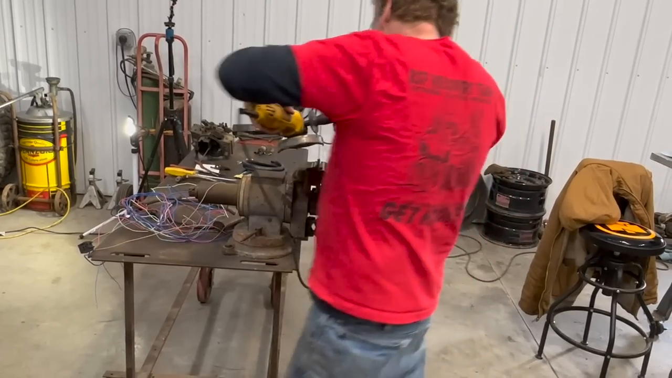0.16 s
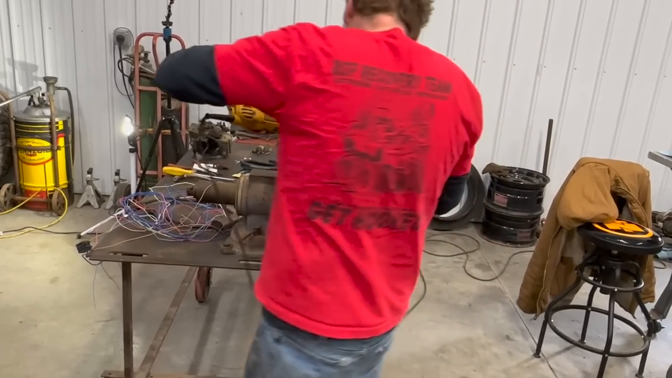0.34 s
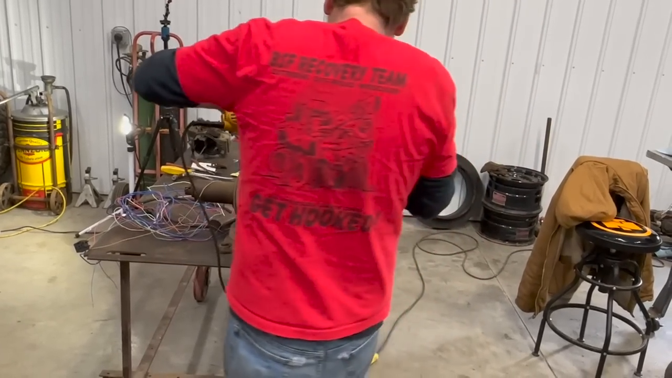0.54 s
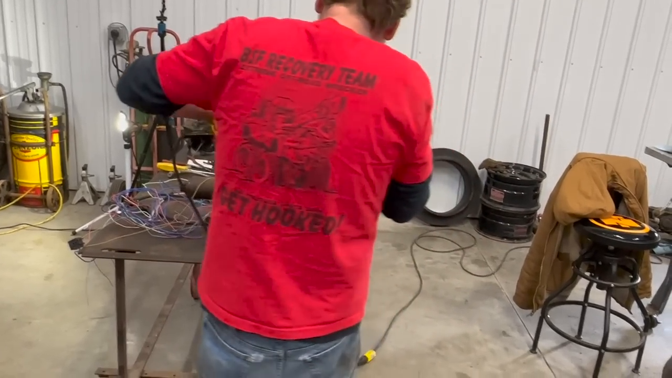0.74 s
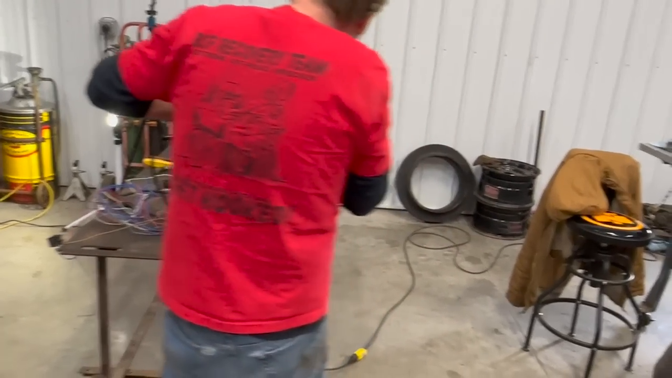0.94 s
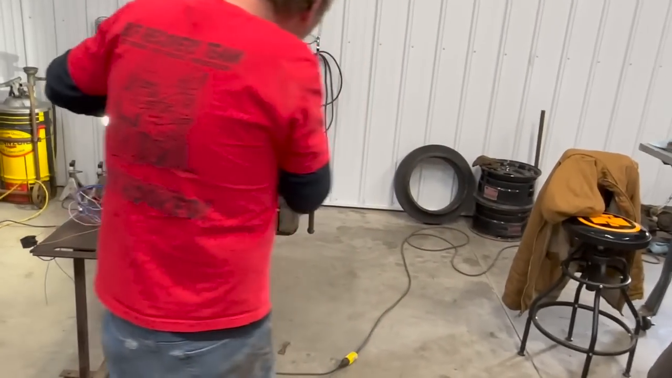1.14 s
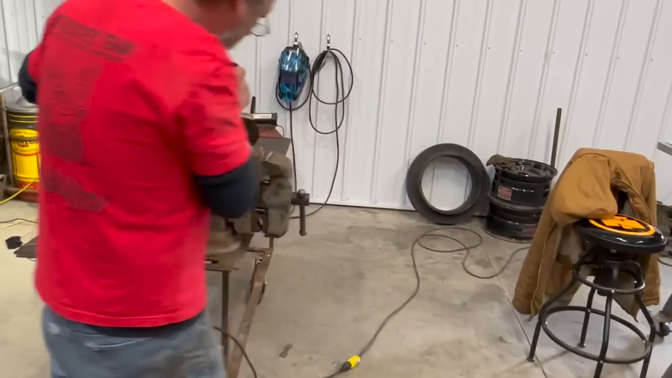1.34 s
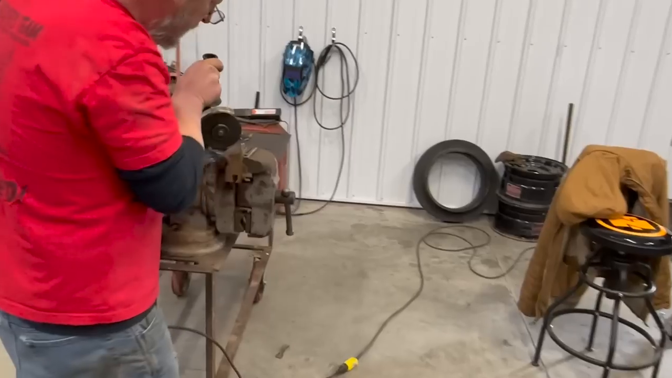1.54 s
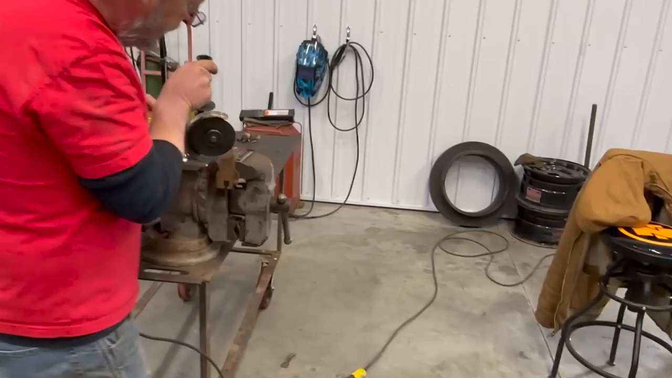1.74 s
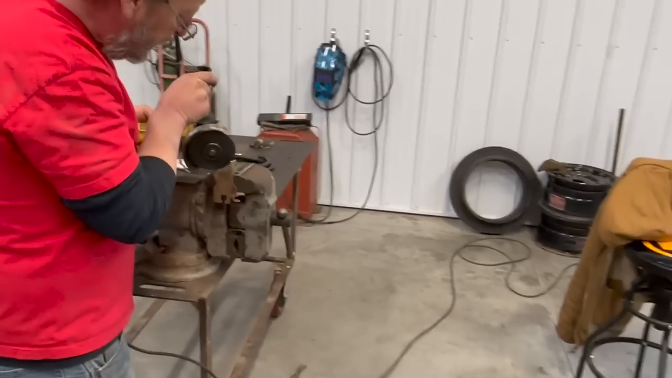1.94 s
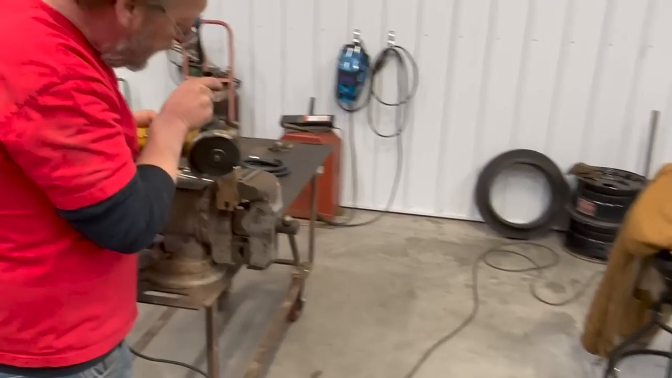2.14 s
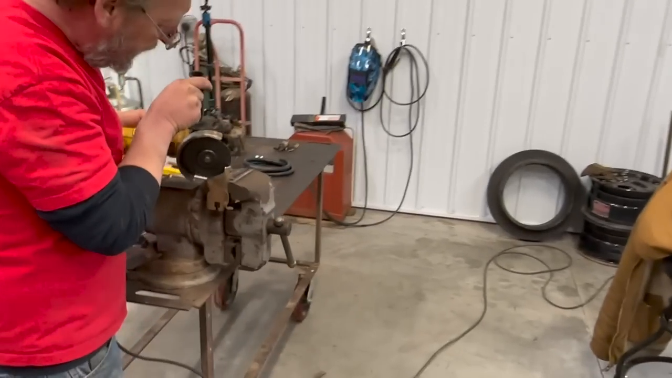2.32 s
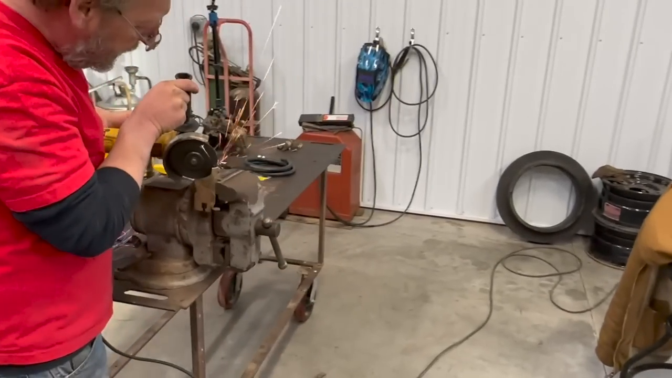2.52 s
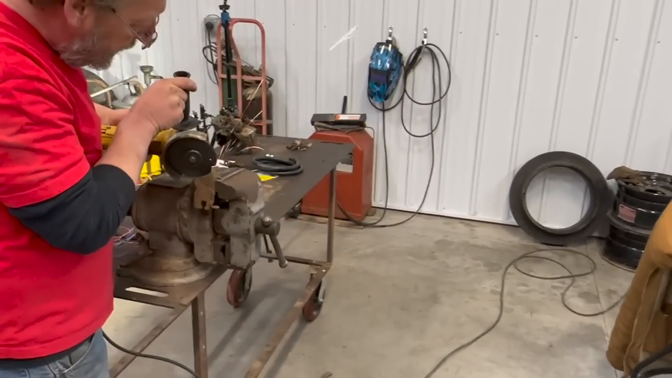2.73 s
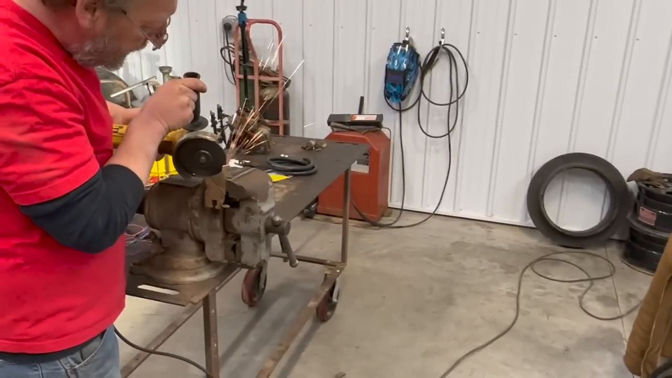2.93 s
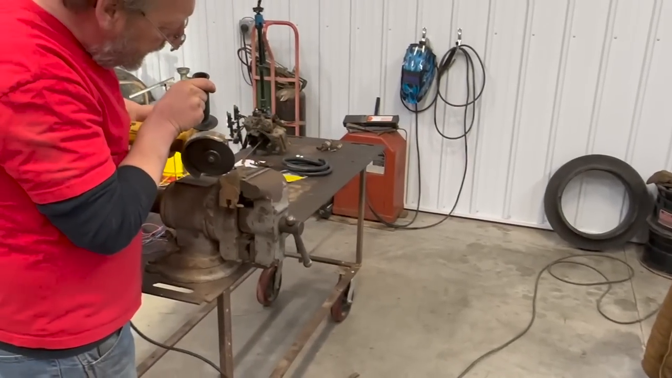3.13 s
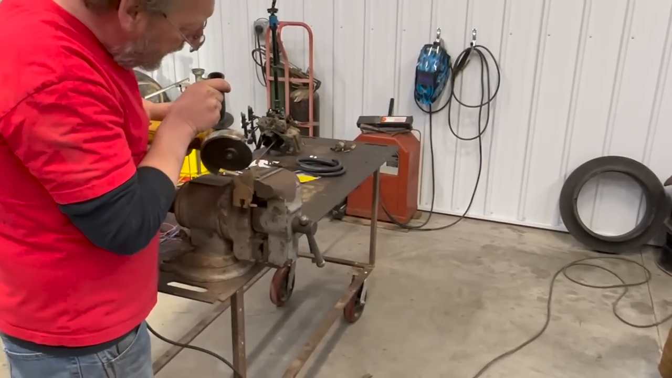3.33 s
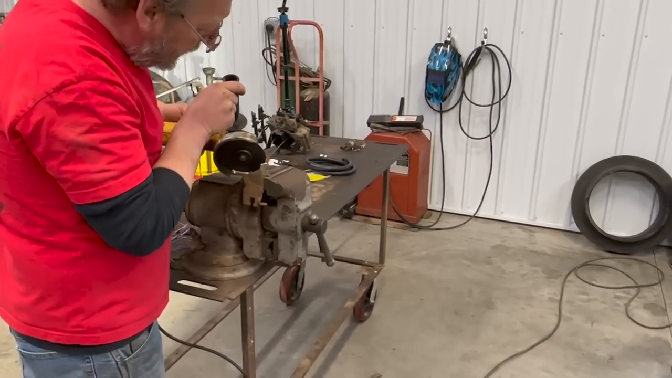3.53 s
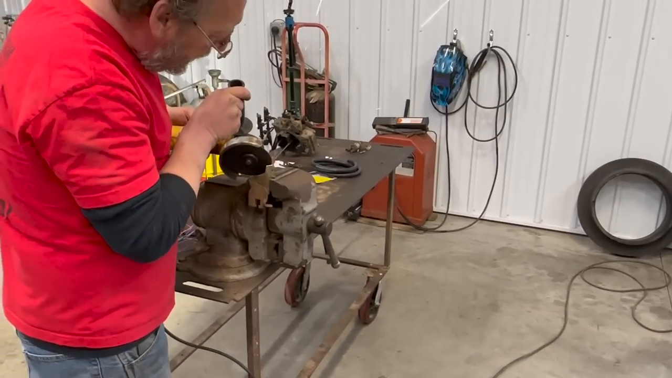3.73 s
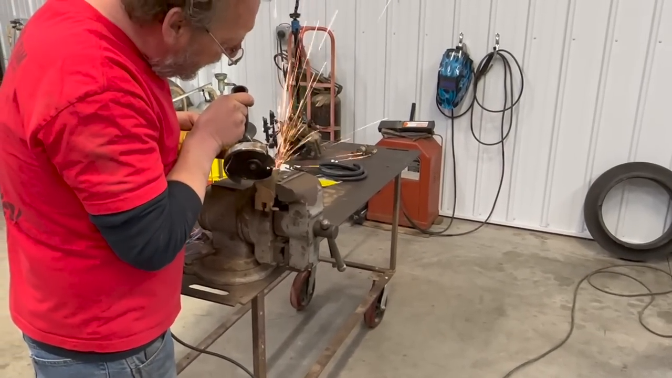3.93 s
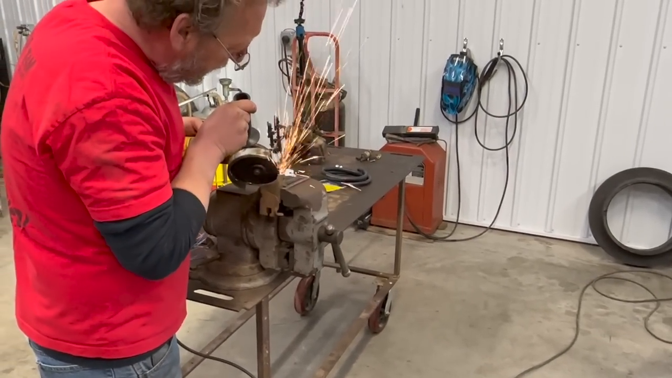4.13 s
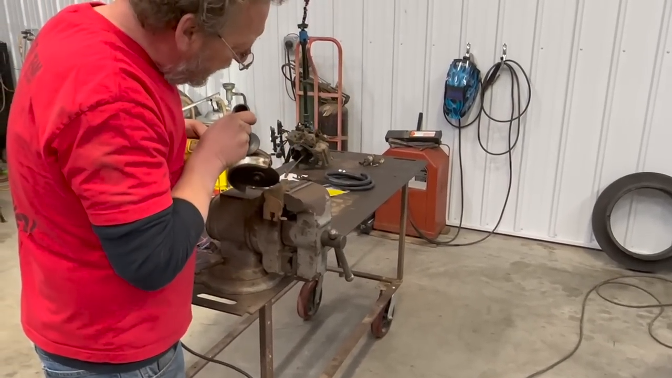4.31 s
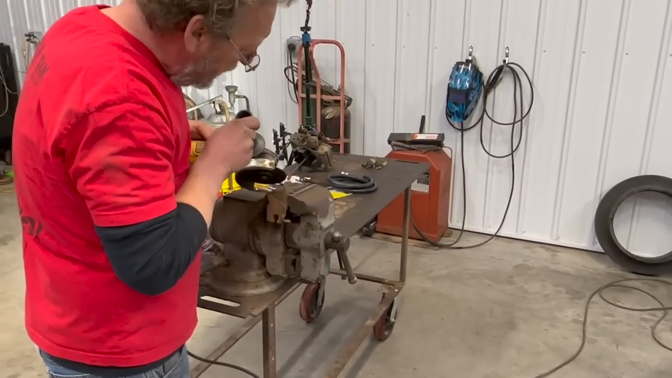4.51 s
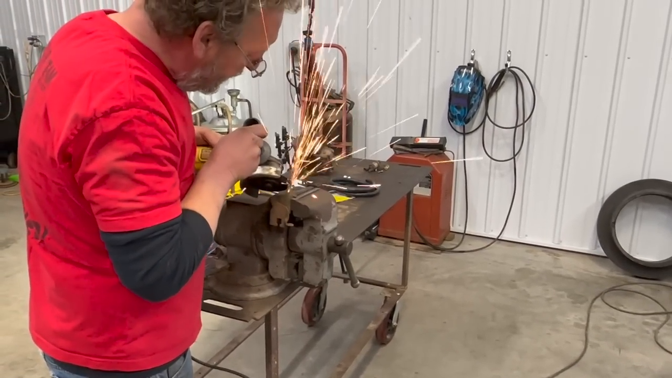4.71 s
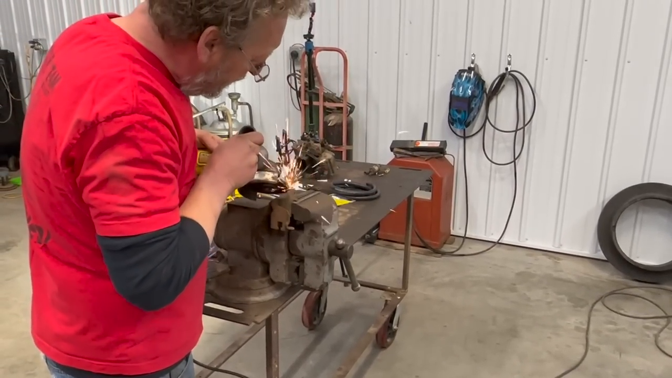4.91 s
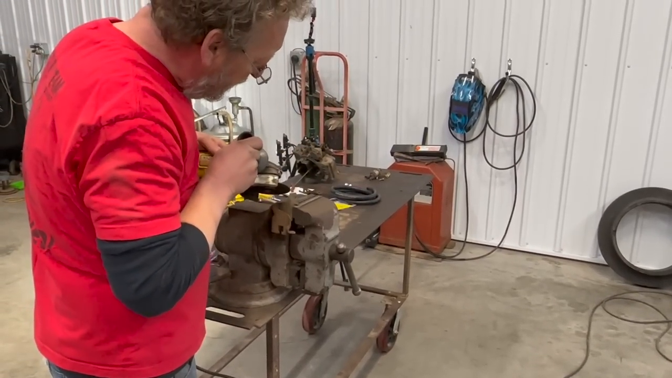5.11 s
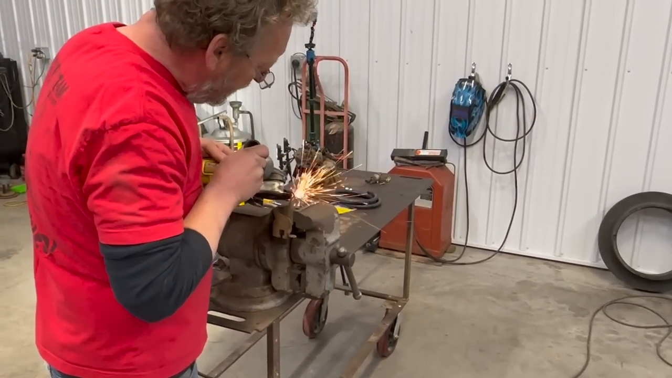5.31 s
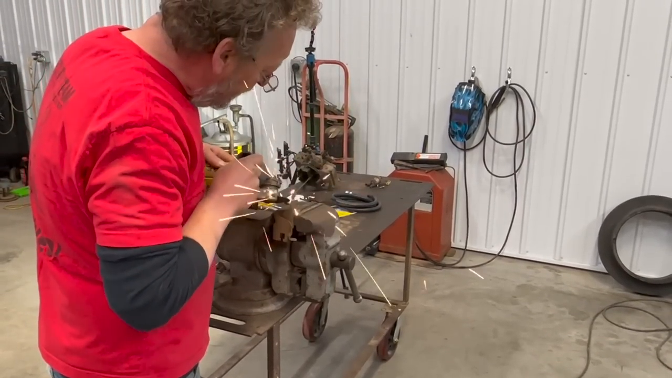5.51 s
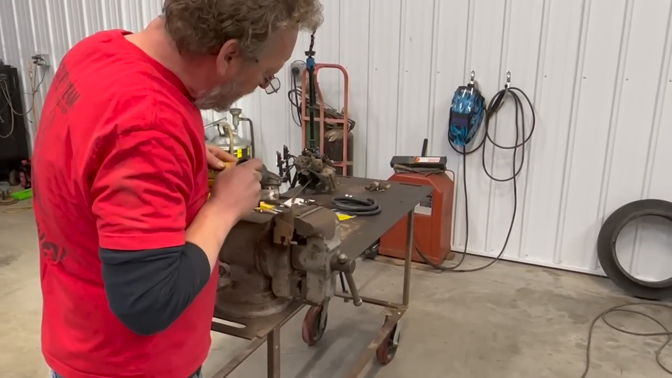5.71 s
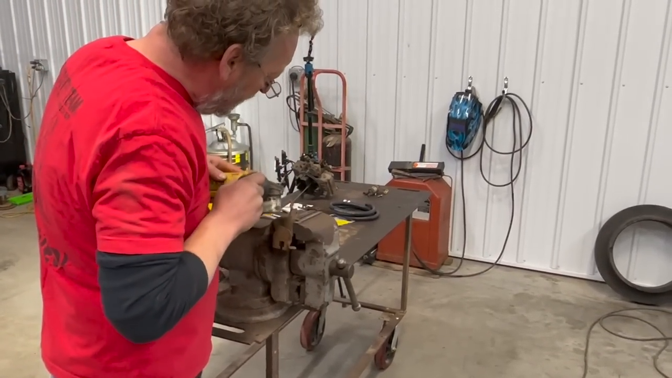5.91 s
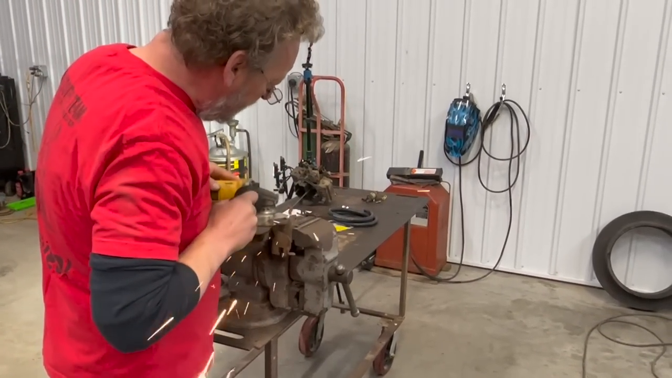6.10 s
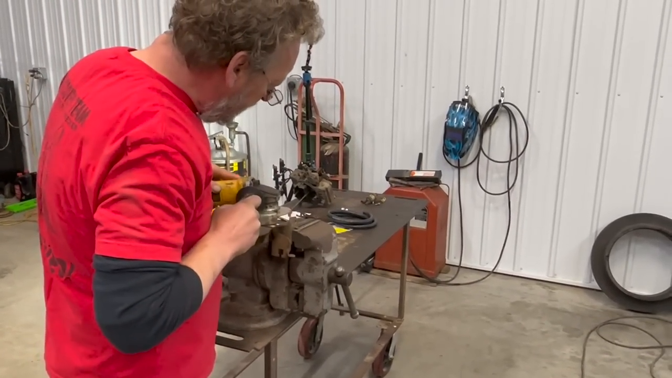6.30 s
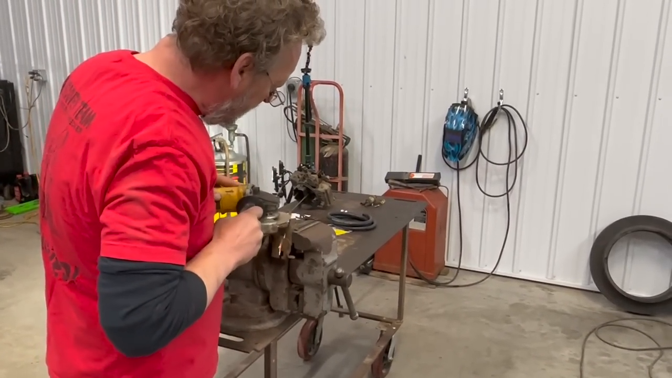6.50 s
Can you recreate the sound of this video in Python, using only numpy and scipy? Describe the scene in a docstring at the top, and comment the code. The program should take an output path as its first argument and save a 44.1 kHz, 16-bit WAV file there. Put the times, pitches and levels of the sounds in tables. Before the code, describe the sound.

An angle grinder heard from a few steps away, moving slightly across a wide stereo picture. For over two seconds it only whirs and hisses, briefly muffled, while shoes scuff dully nearby. Then the cutting wheel touches clamped steel: two longer scraping passes with metallic squeals, short chirping touches and more harsh rasps, ending in spaced bites. The motor sags slightly under load; the shop answers with a short echo.

```python
"""An angle grinder runs free in a metal workshop: its motor hums, its fan rushes and whistles, its spindle bearing rattles.
Then the thin wheel is pressed, pass after pass, into a steel bracket in a vise; each pass rasps and drags the speed down.
Someone takes a few shuffling steps on the concrete near the microphone, and the shop adds a short echo.
Air, chips and shoes are shaped noise; hum, whistle and squeals are sine waves; metal parts are resonances.
One turning angle drives hum, whistle, bearing, cut and squeals, so their pitches sag together under load."""
import sys
import numpy as np
from scipy import signal
from scipy.fft import rfft, irfft, next_fast_len
from scipy.io import wavfile
from scipy.ndimage import uniform_filter1d, map_coordinates

SR = 44100
rng = np.random.default_rng(int(sys.argv[2]) if len(sys.argv) > 2 else 0)


def unload_wav(signal):
    """Save mono or channel-first audio to the path in sys.argv[1] as 16-bit WAV at rate SR, clipped to [-1, 1]."""
    wavfile.write(
        sys.argv[1],
        SR,
        np.round(np.clip(np.atleast_2d(signal).T, -1, 1) * 32767).astype(np.int16),
    )


N = 288855  # length in samples


def amp(db):
    """Decibels become a plain multiplier."""
    return 10 ** (np.asarray(db) / 20)


def unit(x):
    """x scaled to an average strength (rms) of 1."""
    return x / np.sqrt(np.mean(x ** 2) + 1e-20)


def along(points, hz):
    """Reads a curve of (Hz, value) points on a log pitch axis."""
    f, v = np.transpose(points)
    return np.interp(np.log(hz + 1), np.log(f), v)


def curves(rows):
    """One value per sample for each column after the time."""
    s, *cols = np.transpose(rows)
    return [np.interp(np.arange(N) / SR, s, c) for c in cols]


def wobble(rate):
    """A smooth random curve with this many knots a second."""
    knots = rng.standard_normal(int(N * rate / SR) + 4)
    return map_coordinates(knots, [np.arange(N) * rate / SR])


def lagged(x, lag_s):
    """Follows x sluggishly, with this time constant."""
    keep = np.exp(-1 / (lag_s * SR))
    return signal.lfilter([1 - keep], [1, -keep], x)


def filtered(x, response):
    """Multiplies the spectrum of x by a response that depends on pitch."""
    size = next_fast_len(N + SR // 4)
    hz = np.fft.rfftfreq(size, 1 / SR)
    return irfft(rfft(x, size) * response(hz), size)[..., :N]


def resonance(modes, hz):
    """Power gain of a set of resonances, each highest at its own pitch."""
    return sum(amp(db) ** 2 * (hz * width) ** 2 / ((centre ** 2 - hz ** 2) ** 2 + (hz * width) ** 2)
               for centre, width, db in modes)


# How swiftly each resonance swells and sinks, in knots a second.
SURGES_PER_S = 30


def ringing(force, modes, surge_db, focus_hz=None, span_hz=None):
    """A force rings a set of resonances; each swells and sinks alone, and those near any focus ring most."""
    out = np.zeros_like(force)
    for k, (centre, width, db) in enumerate(modes):
        mode = filtered(force, lambda hz: 1j * hz * width / (centre ** 2 - hz ** 2 + 1j * hz * width))
        near = 1 if focus_hz is None else 1 / np.hypot(1, (centre - focus_hz) / span_hz)
        sign = (-1) ** k
        out += sign * near * amp(db + surge_db * wobble(SURGES_PER_S)) * mode
    return out


# Chosen stereo width for motor and cut; part of the treble is nearly mono.
# Each row: pitch in Hz, side minus middle in dB.
MOTOR_WIDTH = [(100, -28), (700, -7.5), (2000, -6), (3500, 0), (6500, -0.5), (8200, 4), (10500, -7),
               (14000, -98)]
CUT_WIDTH = [(200, -9), (1000, -23), (2300, -10), (3700, 2.5), (5300, 5), (6800, -8), (8400, 7.5),
             (10300, -7), (12000, -41), (15000, 5)]


def spread(pair, width):
    """Two unrelated signals become the middle and side of a stereo sound whose middle has rms 1."""
    mid = pair[0]
    side = filtered(pair[1], lambda hz: amp(along(width, hz)))
    return np.array([mid + side, mid - side]) / np.std(mid)


RIM_FLICKER_DB = 3  # how deeply the harmonics of a rim flicker


def rim(turns, wear, size=256):
    """A spinning rim's roughness returns each turn, while wear makes each harmonic drift and flicker."""
    shape = (int(turns[-1]) + 2, size // 2 + 1)
    drift = np.cumsum(wear * rng.standard_normal(shape), axis=0)
    phase = rng.uniform(0, 2 * np.pi, shape[1]) + drift
    flicker = unit(uniform_filter1d(rng.standard_normal(shape), size=5, axis=0))
    strength = amp(RIM_FLICKER_DB * flicker)
    each_turn = irfft(strength * np.exp(1j * phase), size)
    return unit(map_coordinates(each_turn.ravel(), [turns * size]))


# The wheel is pressed into the steel, pass after pass.
# Each row: start in seconds, end in seconds, attack time in seconds, fade over the pass in dB,
# drag on the fan pitch in Hz before the motor's lag, then four levels in dB before trims and easing:
# rasp, ring of the wheel, ring of the guard, growl of the bracket; last, the pitch in Hz near which the wheel rings most.
PASSES = [ (2.362, 2.441, 0.026, 4.5, 389.6, -23.5, -22.5, -25.5, -32, 3670),
          (2.514, 2.819, 0.011, 0, 219, -31, -27, -34.5, -35.5, 3280),
          (2.823, 3.074, .03, 7, 425.6, -26.5, -22.5, -29, -30, 3700),
          (3.648, 3.693, 0.002, -2.5, 605, -28, -25, -32, -46, 3563),
          (3.748, 3.981, 0.039, 4.5, 478, -26, -22, -28.5, -40, 3800),
          (3.982, 4.243, 0.035, 1, 583, -31.5, -27.5, -34, -35, 3550),
          (4.684, 4.716, 0.0025, 1.5, 877, -28.5, -24, -26, -46, 3593),
          (4.797, 4.952, .014, 3, 503.4, -30, -30, -33, -46, 3700),
          (5.317, 5.495, 0.002, 2, 691.6, -29.5, -26.5, -29, -48, 3454),
          (5.949, 6.079, 0.028, 7.5, 246, -29.5, -24.5, -30, -30, 2920),
          (6.486, 6.554, 0.033, 9, 30.17, -23.5, -21, -29, -22, 2790), ]
BITE_DB, BITE_S = 14, 0.0053  # the first grit to land rasps harder
KICK_DB, KICK_S = 4, 0.02  # the landing kicks the wheel into a stronger ring
RELEASE_S, RING_LAG_S = .026, 0.0019  # the wheel lifts off; its ringing trails the contact
SKIM_DB, SKIM_S = -5.5, 0.11  # after a pass the rim still skims the cut for a moment


def pressing():
    """Each pass bites, changes strength and lifts; gives motor drag, rasp, wheel ring, guard ring and bracket growl."""
    t = np.arange(N) / SR
    drag, rasp, ring, guard, bracket = np.zeros((5, N))
    for start, end, attack_s, fade_db, drag_hz, rasp_db, ring_db, guard_db, bracket_db, _ in PASSES:
        age = np.maximum(t - start, 0)
        since = np.maximum(t - end, 0)
        landing = 1 - np.exp(-age / attack_s)
        contact = landing * np.exp(-since / RELEASE_S)
        skim = landing * amp(SKIM_DB) * np.exp(-since / SKIM_S)
        touch = np.maximum(contact, skim)
        eased_db = fade_db * np.minimum(age / (end - start), 1)
        drag += contact * drag_hz
        rasp += touch * amp(rasp_db - eased_db + BITE_DB * np.exp(-age / BITE_S))
        ring += touch * amp(ring_db - eased_db + KICK_DB * np.exp(-age / KICK_S))
        guard += touch * amp(guard_db - eased_db)
        bracket += contact * amp(bracket_db - eased_db)
    return drag, rasp, lagged(ring, RING_LAG_S), guard, bracket


# Tone of the rasp. Each row: pitch in Hz, strength in dB per Hz before the whole is set to its level.
RASP = [(30, -57), (150, -13), (500, -16.5), (800, 3.5), (1500, -0.5), (2500, -5.5), (4000, -3),
        (4800, -10), (7600, 0), (9300, -7.5), (11500, 9), (13000, 4), (15500, 7)]
# Resonances of the gear head, bending modes of the thin wheel, resonances of the guard,
# and damped resonances of the clamped bracket. Each row: pitch in Hz, width in Hz, relative strength in dB.
HEAD = [(10400, 710, 16.5)]
WHEEL = [(2790, 510, 1), (3154, 100, 4), (3325, 92, 1), (3536, 75, 5.5), (3663, 105, 2.5), (3940, 200, 2.5),
         (4230, 240, -3), (4394, 94, 4)]
GUARD = [(5310, 360, -4), (6810, 150, 8.5), (8380, 53, 3), (12140, 200, 2), (13040, 280, 0),
         (15200, 280, -2)]
BRACKET = [(1424, 210, -3.5), (1920, 570, 2.5)]
# The guard rings ever higher. Each row: time in seconds, pitch in Hz near which it rings most.
GUARD_FOCUS = [(2.8, 7100), (5.2, 12600)]
FOCUS_WIDTH_HZ, GUARD_FOCUS_WIDTH_HZ = 560, 4500  # span of the modes that ring most: wheel, guard
MODE_SURGE_DB = 1.6  # how deeply single modes swell and sink
RING_FRESH_DB = -3.5  # extra fresh chips in the ring of wheel and bracket
THUMP_DB = -33  # once-a-turn thump, relative to the wheel's ring before its trim


def cut(turns, rasp, ring, guard, bracket, rasp_trim_db=9.0, ring_trim_db=-2.5, fresh_db=-5.0,
        runout=0.23, chatter_db=1.5, shake_db=1.0, wear=0.202):
    """Grit tears steel: a buzz that repeats with the wheel plus fresh chip hiss set wheel, guard and bracket ringing."""
    grit = np.array([rim(turns, wear), rim(turns, wear)])
    # the wheel is slightly out of round: once a turn it presses harder and thumps the bracket
    pressure = (1 + runout * np.cos(2 * np.pi * turns)) * amp(chatter_db * wobble(120))
    thump = amp(THUMP_DB) * ring * (np.sin(2 * np.pi * turns) + .5 * np.sin(4 * np.pi * turns))
    force = grit + amp(fresh_db) * pressure * rng.standard_normal((2, N))
    hiss = filtered(force, lambda hz: np.sqrt(amp(along(RASP, hz)) ** 2 + resonance(HEAD, hz)))
    # as the wheel slows, its harmonics slide through its own modes; the point of contact decides which ring most
    focus_hz, = curves([((start + end) / 2, hz) for start, end, *_, hz in PASSES])
    scrape = force + amp(RING_FRESH_DB) * rng.standard_normal((2, N))
    screech = ringing(scrape, WHEEL, MODE_SURGE_DB, focus_hz, FOCUS_WIDTH_HZ)
    zing = ringing(force, GUARD, MODE_SURGE_DB, curves(GUARD_FOCUS)[0], GUARD_FOCUS_WIDTH_HZ)
    growl = ringing(scrape, BRACKET, MODE_SURGE_DB)
    rasp = rasp * amp(shake_db * wobble(45))  # the hands shake
    rasping = amp(rasp_trim_db) * rasp * spread(hiss, CUT_WIDTH)
    screeching = amp(ring_trim_db) * ring * spread(screech, CUT_WIDTH)
    zinging = guard * spread(zing, CUT_WIDTH)
    growling = bracket * spread(growl, MOTOR_WIDTH)
    return rasping + screeching + zinging + growling + thump


# A mode of the wheel or the bracket sings under pressure.
# Each row: start in seconds, end in seconds, pitch of the mode in Hz, level in dB before it fades and wavers.
SQUEALS = [ (2.535, 2.69, 3165, -35), (2.53, 2.92, 4390, -33.5), (2.56, 2.9, 1060, -40.5),
           (2.567, 2.7, 3335, -32), (2.567, 2.746, 6850, -28.5), (2.814, 3.06, 1222, -38),
           (2.84, 3.065, 2790, -30), (2.852, 3.04, 3140, -40), (2.89, 3.104, 3670, -28.5),
           (3.651, 3.706, 3170, -28.5), (3.849, 4.02, 2790, -33), (4.02, 4.15, 3310, -32.5),
           (4.093, 4.205, 856, -35), (4.197, 4.24, 2760, -35), (4.688, 4.719, 3172, -21),
           (4.842, 4.908, 2785, -25), (4.86, 4.961, 3460, -34.5), ]
SQUEAL_RISE_CYCLES, SQUEAL_FALL_CYCLES = 22, 19  # low modes swell and die more slowly
SQUEAL_FADE_DB = 1.5  # a squeal weakens by this much over its length
SQUEAL_JITTER, SQUEAL_WAVER_DB = .027, 2.5  # jitter of the wheel's angle (radians), waver of the level


def squeals(turns, wheel_hz, port_lag_s=0.00005):
    """A mode locks to the nearest harmonic of the wheel and sings briefly, made unsteady by the grinding."""
    t, out = np.arange(N) / SR, np.zeros((2, N))
    for start, end, hz, db in SQUEALS:
        order = round(hz / np.interp((start + end) / 2, t, wheel_hz))
        rise = 1 - np.exp(-np.maximum(t - start, 0) * hz / SQUEAL_RISE_CYCLES)
        fall = np.exp(-np.maximum(t - end, 0) * hz / SQUEAL_FALL_CYCLES)
        ports = np.array([[.5], [-.5]]) * hz * port_lag_s
        phase = 2 * np.pi * (order * turns + ports) + SQUEAL_JITTER * order * wobble(75)
        faded_db = SQUEAL_FADE_DB * np.clip((t - start) / (end - start), 0, 1)
        out += rise * fall * amp(db - faded_db + SQUEAL_WAVER_DB * wobble(60)) * np.sin(phase)
    return np.sqrt(2) * out


# How the tool is turned. Each row: time in seconds, direction from 0 (exhaust slots toward the microphone)
# to 1 (gear head toward it).
FACING = [(0, 0.087), (1.3, 0.18), (1.6, 0.87), (2.3, 1), (3.3, 1), (5.7, 0.35), (6.2, 0.33)]
# the worker's back hides the tool for a while: start, end, time scale of each transition (seconds)
HIDDEN_FROM_S, HIDDEN_TO_S, HIDING_S = 0.3, 1.34, 0.14


def radiated(level):
    """The dB of one machine part as the tool is turned and as the worker's back hides it."""
    exhaust_db, head_db, hidden_db = level
    t = np.arange(N) / SR
    hiding = np.tanh((t - HIDDEN_FROM_S) / HIDING_S)
    showing = np.tanh((t - HIDDEN_TO_S) / HIDING_S)
    hidden = (hiding - showing) / 2
    return exhaust_db + head_db * curves(FACING)[0] + hidden_db * hidden


# Hum of the motor. Each row: time in seconds, level in dB before a small waver.
HUM = [(0.0, -44), (1.05, -45), (1.28, -56.5), (1.6, -46.5), (2.38, -58), (2.48, -43), (2.68, -41),
       (3.3, -44.5), (4.2, -45.5), (4.6, -50), (4.9, -46), (5.05, -56), (5.38, -56), (5.5, -41), (5.6, -52),
       (6.55, -59)]
# Whistle of the fan before boost and waver: dB from the exhaust side, change toward the gear head in dB,
# change when hidden in dB.
WHISTLE_LEVEL = (-36, -7, -1)
# a chosen level rule: the whistle is set louder while the speed sags, by at most this boost; the sag sets how soon
WHISTLE_BOOST_DB, WHISTLE_SAG_HZ = 18, 80
FAN_BLADES = 25


def rotor(turns, sag_hz, hum_waver_db=1.5, waver_db=4.0, jitter=0.45, port_phase=2.14):
    """Imbalance hums once a turn; the fan blades whistle and reach the two ports out of step."""
    hum = amp(curves(HUM)[0] + hum_waver_db * wobble(16)) * np.sin(2 * np.pi * turns)
    boost_db = WHISTLE_BOOST_DB * (1 - np.exp(-sag_hz / WHISTLE_SAG_HZ))
    whistle_db = radiated(WHISTLE_LEVEL) + boost_db
    blades = 2 * np.pi * FAN_BLADES * turns + jitter * wobble(60)
    ports = np.array([[-.5], [.5]]) * port_phase
    whistle = amp(whistle_db + waver_db * wobble(50)) * np.sin(blades + ports)
    return np.sqrt(2) * (hum + whistle)


# Tone of the rushing air. Each row: pitch in Hz, strength in dB per Hz before the whole is set to its level.
AIR = [(25, -66), (60, -27.5), (200, -27.5), (400, -23), (600, -20.5), (720, -14.5), (850, -10),
       (1100, -11), (1450, -7.5), (2000, -7.5), (2600, -8), (3500, -10), (4700, -14), (6500, -12),
       (15000, -33)]
# Rush before trim and flutter: dB from the exhaust side, change toward the gear head in dB, change when hidden in dB.
AIR_LEVEL = (-32, 1, -1.35)


def air(turns, air_db, trim_db=1.08, flutter_db=0.73, repeat_db=-13.5, bounce=0.34, bounce_s=.004, sway_s=0.000312):
    """Air rushes through the vents, partly in step with the rotor; its bounce off the bench shifts as the tool moves."""
    in_step = np.array([rim(turns, 0.233, size=128), rim(turns, 0.22, size=128)])
    flow = rng.standard_normal((2, N)) + amp(repeat_db) * in_step
    late = np.clip(np.arange(N) - SR * (bounce_s + sway_s * wobble(2)), 0, N - 1)
    flow = flow + bounce * np.array([map_coordinates(side, [late]) for side in flow])
    rush = filtered(flow, lambda hz: amp(along(AIR, hz)))
    return amp(air_db + trim_db + flutter_db * wobble(35)) * spread(rush, MOTOR_WIDTH)


# Tone of the exhaust jet. Each row: pitch in Hz, strength in dB per Hz before the whole is set to its level.
VENT = [(3000, -23.5), (6500, -5), (8000, -4), (9500, 2), (11500, 0), (15000, -6)]
# Hiss: dB from the exhaust side, change toward the gear head in dB, change when hidden in dB.
HISS_LEVEL = (-29, -8, -8.5)


def vent(hiss_db):
    """The jet from the exhaust slots hisses, loudest when it points at the microphone."""
    jet = filtered(rng.standard_normal((2, N)), lambda hz: amp(along(VENT, hz)))
    return amp(hiss_db) * spread(jet, MOTOR_WIDTH)


# Tone of the gear case. Each row: pitch in Hz, strength in dB per Hz before the whole is set to its level.
GEARCASE = [(100, -44.5), (850, -6.5), (1300, -25.5), (2400, -5.5), (2900, -8), (3420, -4.5), (3750, -12.5),
            (4600, -19.5), (6500, -8), (7900, -20.5), (9300, -8), (10500, 3.5), (11100, -2.5), (12000, -8),
            (14500, -20)]
# Rattle before trim: dB from the exhaust side, change toward the gear head in dB, change when hidden in dB.
RATTLE_LEVEL = (-34, 9.36, -8)
CAGE_RATIO = .39  # turns of the ball cage per spindle turn


def bearing(turns, rattle_db, trim_db=-1.0, chatter_db=-8.0, scatter_db=3.5, ring_s=0.0016, slip=.28, steady=0.49):
    """The bearing knocks once per ball-cage turn and chatters lightly with the spindle; the gear case rings."""
    knocks = np.zeros(N)
    for cycles, db in ((CAGE_RATIO * turns, 0), (turns, chatter_db), (2 * turns, 2 * chatter_db)):
        each = np.arange(int(cycles[-1]))
        chance = rng.uniform(-1, 1, (len(each), 2))
        at = np.interp(each + slip * chance[:, 0], cycles, np.arange(N)).astype(int)
        knocks += np.bincount(at, amp(db + scatter_db * chance[:, 1]), N)
    rings = signal.lfilter([1], [1, -np.exp(-1 / (ring_s * SR))], knocks)
    rough = (steady + unit(rings)) * rng.standard_normal((2, N))
    rattle = filtered(rough, lambda hz: amp(along(GEARCASE, hz)))
    return amp(rattle_db + trim_db) * spread(rattle, MOTOR_WIDTH)


# Resonances of the motor housing. Each row: pitch in Hz, width in Hz, relative strength in dB.
HOUSING = [(1452, 59, -1.5), (1680, 47, 1), (1865, 110, -1.5), (2220, 140, -4), (2468, 130, -1.5),
           (2810, 150, -2)]
# Housing: dB from the exhaust side, change toward the gear head in dB, change when hidden in dB.
HOUSING_LEVEL = (-36.5, -1.4, -6)
HOUSING_SURGE_DB = 2.4  # how deeply its resonances swell and sink


def housing(housing_db):
    """Turbulent air sets the hollow motor housing ringing in wavering resonances."""
    turbulence = rng.standard_normal((2, N))
    hollow = ringing(turbulence, HOUSING, HOUSING_SURGE_DB)
    return amp(housing_db) * spread(hollow, MOTOR_WIDTH)


# Steps, shuffles and faint low rumble (the row near 3 s).
# Each row: start in seconds, level in dB before rise and fall, length in seconds.
STEPS = [(0, -50, 1), (0.837, -38.5, 0.53), (1.19, -43.5, 0.68), (1.5, -34.5, 0.42), (2.122, -40.5, 0.59),
         (2.455, -39, 0.48), (2.996, -60, 1), (4.674, -57, 0.18)]
# Tone of a sole on concrete. Each row: pitch in Hz, strength in dB per Hz before the whole is set to its level.
SCUFF = [(25, -24), (80, -6.5), (200, -1), (330, -2.5), (550, -2), (1000, -13), (3000, -60)]


def steps(rise_s=0.046, fall_db=17.5):
    """Soles land and drag with a dull scuff, and a faint rumble joins: low noise that swells, then falls."""
    level = np.zeros(N)
    for s, db, length in STEPS:
        age = np.maximum(np.arange(N) / SR - s, 0)
        level += amp(db - fall_db * age / length) * (1 - np.exp(-age / rise_s))
    scuff = filtered(rng.standard_normal((2, N)), lambda hz: amp(along(SCUFF, hz)))
    return level * spread(scuff, [(100, -17), (500, -2.5)])  # (Hz, side minus middle dB)


# Echo of the shop. Each row: pitch in Hz, seconds until it has died by 60 dB.
SHOP = [(200, 0.23), (2000, 0.75), (8000, 0.18), (15000, 0.033)]


def shop(x):
    """The sheet-metal walls answer with a tail of decaying noise, the high treble dying first."""
    hz, t, z = signal.stft(rng.standard_normal((2, SR // 2)), SR, nperseg=256)
    decay_db = -60 * t / along(SHOP, hz)[:, None]
    tail = signal.istft(z * amp(decay_db), SR, nperseg=256)[1]
    return signal.fftconvolve(x, tail / np.linalg.norm(tail[0]), axes=1)[:, :N]


FREE_HZ = 15738  # blade-passing pitch of the fan when the wheel runs free
INERTIA_S = .33  # time the motor takes to follow a change of load
GEAR_RATIO = 32 / 9  # motor turns per wheel turn


def scene(room_db=-15.5):
    """One motor drives the fan and, through bevel gears, the wheel; it sags under each pass and recovers."""
    drag_hz, rasp, ring, guard, bracket = pressing()
    sag_hz = lagged(drag_hz, INERTIA_S)
    motor_hz = (FREE_HZ - sag_hz) / FAN_BLADES
    motor_turns = np.cumsum(motor_hz) / SR
    wheel_hz, wheel_turns = motor_hz / GEAR_RATIO, motor_turns / GEAR_RATIO
    cutting = cut(wheel_turns, rasp, ring, guard, bracket) + squeals(wheel_turns, wheel_hz)
    machine = (rotor(motor_turns, sag_hz) + air(motor_turns, radiated(AIR_LEVEL)) + vent(radiated(HISS_LEVEL))
               + bearing(wheel_turns, radiated(RATTLE_LEVEL)) + housing(radiated(HOUSING_LEVEL)))
    grinder = cutting + machine
    return grinder + amp(room_db) * shop(grinder) + steps()


TOP_HZ = 15850  # upper limit of the sound


def record(dry):
    """The left port is a little more sensitive in the low treble; nothing sounds above the upper limit."""
    lean = [(100, 0.5), (600, 2.0), (2000, -1.5), (4400, 4.5), (8000, 2.0), (12000, -0.5)]  # (Hz, left minus right dB)
    halves = np.array([[.5], [-.5]])
    return filtered(dry, lambda hz: amp(halves * along(lean, hz)) * (hz < TOP_HZ))


dry = scene()
out = record(dry)
unload_wav(out)
```